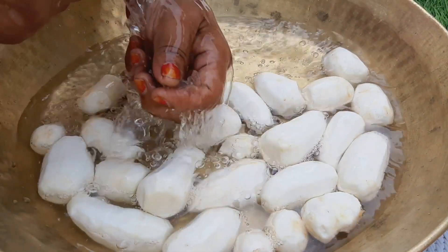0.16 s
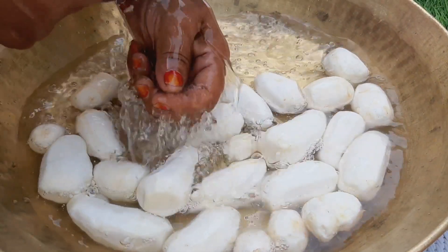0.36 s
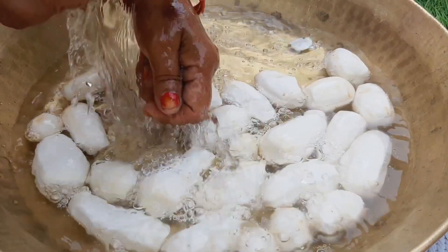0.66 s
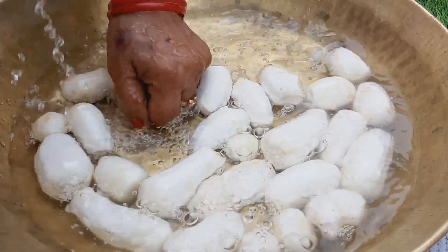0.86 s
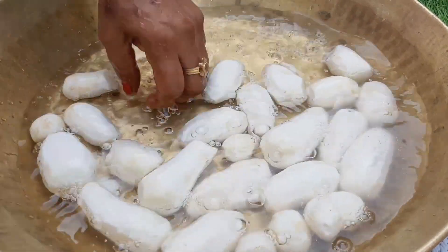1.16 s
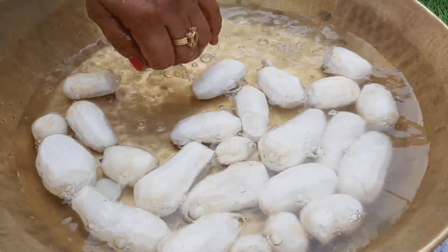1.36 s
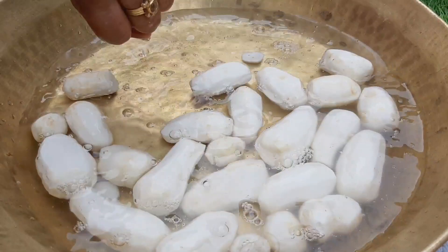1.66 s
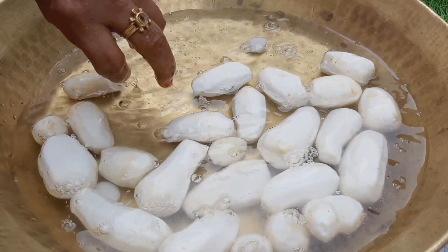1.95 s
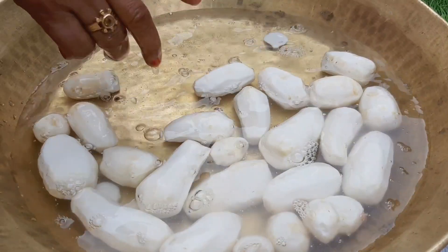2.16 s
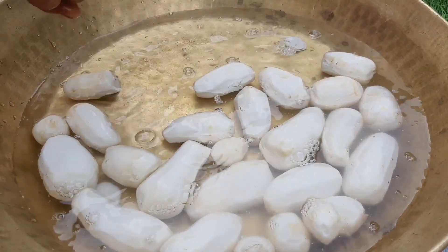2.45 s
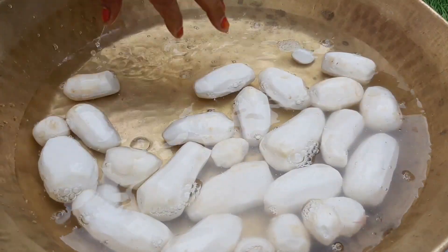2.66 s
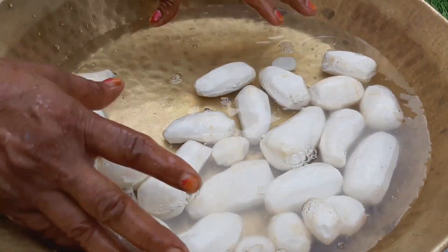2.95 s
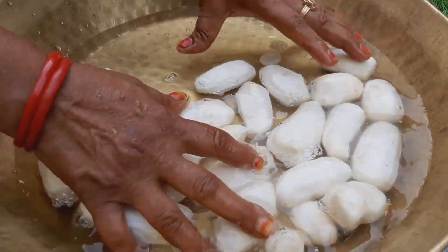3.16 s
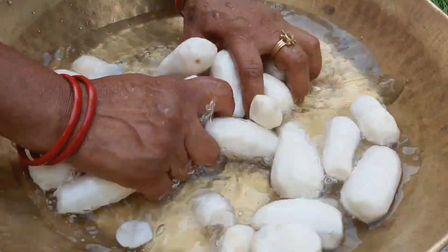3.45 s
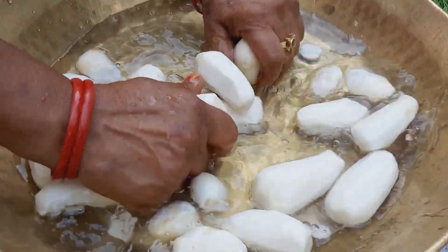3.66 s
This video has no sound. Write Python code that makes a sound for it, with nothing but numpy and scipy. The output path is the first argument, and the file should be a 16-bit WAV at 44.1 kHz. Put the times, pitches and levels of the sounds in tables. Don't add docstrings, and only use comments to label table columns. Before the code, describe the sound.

Splashing water in a metal basin bubbles and stops, then roots are stirred with knocks and clinks

```python
import sys
import numpy as np
from scipy import signal
from scipy.fft import rfft, irfft, next_fast_len
from scipy.io import wavfile
from scipy.ndimage import uniform_filter1d, map_coordinates

SR = 44100
rng = np.random.default_rng(int(sys.argv[2]) if len(sys.argv) > 2 else 0)


def file_out(sig):
    cols = np.atleast_2d(sig).T
    lim = np.clip(cols, -1, 1)
    pcm = np.round(lim * 32767).astype(np.int16)
    wavfile.write(sys.argv[1], SR, pcm)


def gain_from_db(level_db):
    decades = np.asarray(level_db, float) / 20
    return 10 ** decades


N = 167580


def unit(x):
    return x / np.sqrt(np.mean(x ** 2) + 1e-20)


def along(points, hz):
    f, v = np.transpose(points)
    return np.interp(np.log(hz + 1), np.log(f + 1), v)


def strength(rows):
    s, db = np.transpose(rows)
    return np.interp(np.arange(N) / SR, s, db, left=-120, right=-120)


def wobble(rate_hz):
    knots = rng.standard_normal(int(N * rate_hz / SR) + 4)
    return map_coordinates(knots, [np.arange(N) * rate_hz / SR])


def filtered(x, response):
    m = next_fast_len(N + 8192)
    return irfft(rfft(x, m) * response(np.fft.rfftfreq(m, 1 / SR)), m)[..., :N]


def highpass(x, corner_hz):
    return filtered(x, lambda hz: 1 / (1 + (corner_hz / (hz + 1)) ** 4))


# (frequency [Hz], correlation [0-1])
ALIKE = [(60, 0.98), (300, 0.88), (1000, 0), (4000, 0.026)]


def rush(gain, patchy_db):
    z = signal.stft(rng.standard_normal((2, N)), nperseg=256)[2]
    field = uniform_filter1d(rng.standard_normal(z.shape[1:]), size=5, axis=0)
    field = uniform_filter1d(field, size=4, axis=1)
    pair = signal.istft(z * gain_from_db(patchy_db * unit(field)), nperseg=256)[1][:, :N]

    def mid_side_gain(hz):
        turn = np.arccos(np.clip(along(ALIKE, hz), 0, 1)) / 2
        return gain(hz) * [np.cos(turn), np.sin(turn)]

    mid, side = filtered(pair, mid_side_gain)
    return unit(np.array([mid + side, mid - side]))


def grains(s, db, hz, cycles, rise, spread, size, onset=30):
    t = np.arange(size) / SR
    u = t * (hz / cycles)[:, None]
    envelope = gain_from_db(db)[:, None] * np.exp(-3 * u) * (1 - np.exp(-onset * u))
    wave = envelope * np.sin(2 * np.pi * hz[:, None] * t * (1 + rise * np.minimum(u, 2)))
    place = spread * rng.standard_normal((len(s), 2))
    out = []
    for side in (1, -1):
        start = np.round(s * SR + side * (-2 + 3 * place[:, 0])).astype(int).clip(0)
        at = start[:, None] + np.arange(size)
        panned = wave * gain_from_db(2 * side * place[:, 1:])
        out.append(np.bincount(at.ravel(), panned.ravel(), N + size + 99)[:N])
    return np.array(out)


def swarm(level_db, span_s, count, hz, octaves, cycles, scatter_db, size):
    u, g = rng.random((count, 2)), rng.standard_normal((count, 2))
    s = np.interp(u[:, 0], (0, 1), span_s)
    db = level_db[(s * SR).astype(int).clip(0, N - 1)] - scatter_db * np.log(1.03 - u[:, 1])
    pitch_hz = (hz * 2 ** (octaves * g[:, 0])).clip(150, 16000)
    return grains(s, db, pitch_hz, cycles * np.exp(0.29 * g[:, 1]), 0.091, 0.93, size)


def ringing(events, modes, detune, crack_db, crack_s, chatter):
    snap_db, snap_s = 6.5, 0.0047
    out, t = np.zeros((2, N + SR)), np.arange(SR // 6) / SR
    f, level, t60 = np.transpose(modes)[:, :, None]
    attack = 1 - np.exp(-t / 0.00079)
    for s, db, ring_db, damping in events:
        g = rng.standard_normal((4, len(modes), 1))
        rub = uniform_filter1d(rng.standard_normal((len(modes), len(t))), size=50, axis=1)
        rough = 1 + chatter * unit(rub)
        for side in (0, 1):
            decay = gain_from_db(level + 2 * g[0] + 2 * g[2 + side] - 60 * damping * t / t60)
            tone = np.sin(2 * np.pi * f * (1 + detune * g[1]) * t + side * g[3])
            ring = (rough * decay * tone).sum(0)
            crack = gain_from_db(crack_db - 60 * damping * t / crack_s) + gain_from_db(crack_db + snap_db - 60 * t / snap_s)
            crack = crack * rng.standard_normal(len(t))
            out[side, round(s * SR):][:len(t)] += gain_from_db(db) * (gain_from_db(ring_db - 9.5) * ring + crack) * attack
    return highpass(out[:, :N], 900)


def echoes(x, t60):
    t = np.arange(SR // 2) / SR
    tail = rng.standard_normal((2, len(t))) * gain_from_db(-60 * t / t60)
    return signal.fftconvolve(np.atleast_2d(x), tail / np.linalg.norm(tail[0]), axes=1)[:, :N]


# (frequency [Hz], density [dB per Hz])
RUMBLE = [(28, -21), (48, 0.5), (90, -1), (125, -11.5), (175, -4.5), (300, -25.5), (600, -42.5)]
# (frequency [Hz], density [dB per Hz])
AIR = [(500, -23.5), (1500, -14.5), (2650, -16), (4600, -8.5), (6500, -17), (8400, -22), (12300, -17),
       (14300, -16.5)]


def air():
    rumble = rush(lambda hz: gain_from_db(along(RUMBLE, hz)) * (hz < 600), patchy_db=1.33)
    hiss = rush(lambda hz: gain_from_db(along(AIR, hz)) * (hz > 500), patchy_db=1.7)
    return gain_from_db(-51 + 0.75 * wobble(0.68)) * rumble + gain_from_db(-61.5) * hiss


# (center [Hz], width [Hz], level [dB], flutter [dB])
INSECTS = [
    (3811, 80, -60, 2),
    (3400, 50, -71, 2),
    (10270, 970, -60, 0.3),
    (5560, 500, -80.5, .5),
]
# (time [s], level [dB])
CHORUS = [(0, 8.5), (1.9, 0), (2.3, -6), (2.8, 3.5), (3.0, -5), (3.3, -15), (3.8, 3)]


def insects():
    out = np.zeros((2, N))
    for k, (center_hz, width_hz, db, flutter_db) in enumerate(INSECTS):
        level_db = db + (k < 2) * strength(CHORUS)
        level_db = level_db + flutter_db * wobble(45) + 0.67 * flutter_db * wobble(4.66)
        band = rush(lambda hz: np.exp(-((hz - center_hz) / width_hz) ** 2), patchy_db=0.5)
        out += gain_from_db(level_db) * band
    return out


# (time [s], level [dB])
FLOW = [
    (0, -40),
    (.3, -39.5),
    (.76, -38),
    (.81, -43.5),
    (.87, -42),
    (.92, -46),
    (.97, -55),
    (1.15, -60.5),
    (1.6, -70),
]
# (frequency [Hz], density [dB per Hz])
SPRAY = [(450, -22.5), (900, -8), (2000, -8), (3500, -6.5), (8000, -16.5), (14500, -11), (16000, -7)]


def pour():
    flow = strength(FLOW) + 1.7 * wobble(30.7)
    deep = flow + 0.45 * (flow - flow[0])
    spray = rush(lambda hz: gain_from_db(along(SPRAY, hz)) * (hz > 400), patchy_db=3)
    spray = gain_from_db(deep + 2.5 + 1.6 * wobble(60.2)) * spray
    bubbles = swarm(deep, (0, 0.95), count=1500, hz=2223, octaves=0.435, cycles=8.8, scatter_db=3.5, size=700)
    fizz = swarm(flow - 7.5, (0, 1.6), count=5000, hz=7000, octaves=0.8, cycles=4, scatter_db=2.5, size=120)
    spatter = swarm(flow + 6, (0, 1.6), count=700, hz=9500, octaves=0.58, cycles=4.8, scatter_db=3.5, size=60)
    return spray + bubbles + fizz + spatter


# (time [s], peak [dB])
SPATS = [(0.0074, -18), (0.1071, -17.5), (0.179, -21), (0.196, -14.5), (0.2157, -19), (0.336, -15.5),
         (0.403, -23), (0.4343, -38), (0.4538, -31), (0.5136, -25), (0.589, -22), (0.6069, -21),
         (0.624, -18), (0.675, -24.5), (0.747, -23), (0.784, -16), (0.8035, -34), (0.843, -15.5),
         (0.8805, -22), (0.9626, -27), (0.991, -32.5), (1.1248, -36.5), (1.9124, -34), (3.3794, -37),
         (3.4958, -37), (3.5147, -47), (3.61, -35.5), (3.615, -27), (3.6256, -29), (3.6603, -25),
         (3.681, -31), (3.6958, -37), (3.7004, -29), (3.7034, -28), (3.749, -30.5)]


def drops():
    s, db = np.repeat(SPATS, 7, axis=0).T
    g = rng.standard_normal((len(s), 3))
    burst_s = 0.0012
    hz = (8500 * 2 ** (0.5 * g[:, 2])).clip(2500, 16000)
    ticks = grains(s + burst_s * abs(g[:, 0]), db - 2.5 + 3.0 * g[:, 1], hz, 4.1, 0.051, 0.36, size=100)
    return highpass(ticks, 2500)


# (time [s], peak [dB], pitch [Hz])
GURGLES = [(0.059, -44, 770), (0.108, -31.5, 768), (0.163, -45, 817), (0.184, -36, 1025),
           (0.231, -30.5, 920), (0.274, -38, 910), (0.306, -32, 870), (0.367, -28.5, 986),
           (0.403, -38, 895), (0.442, -46, 902), (0.495, -46, 820), (0.537, -39, 738), (0.563, -33.5, 950),
           (0.629, -34.5, 920), (0.74, -31.5, 960), (0.855, -48, 906)]


def gurgles():
    s, db, hz = np.transpose(GURGLES)
    return grains(s, db + 1, hz, 20, 0.027, 0.1, size=2000, onset=7)


# (time [s], peak [dB], pitch [Hz])
BUBBLES = [(0.147, -28, 1540), (0.16, -10, 2360), (0.151, -23, 1380), (0.173, -24.5, 1490),
           (0.165, -19, 1370), (0.375, -21, 3320), (0.481, -16.5, 2120), (0.568, -21, 1995),
           (0.624, -26, 1830), (0.673, -21.5, 2940), (0.719, -22, 1540), (0.744, -20.5, 2130),
           (0.771, -14, 4650), (0.992, -23.5, 4040), (0.13, -18.5, 3280), (.217, -26.5, 1480),
           (.34, -23, 1440), (.353, -23.5, 1680), (.421, -35, 2070), (.652, -18, 2030), (.815, -26.5, 2060),
           (.886, -31.5, 2000), (.908, -36, 1950)]


def large_bubbles():
    s, db, hz = np.transpose(BUBBLES)
    return grains(s, db - 2.5, hz, 22, 0.021, 0.11, size=1500)


# (time [s], peak [dB], ring over crack [dB], damping [x])
KNOCKS = [
    (.369, -16, -32, 0.37),
    (2.9695, -17.5, -3.5, 0.84),
    (3.5355, -25, 6.5, 1.1),
    (3.5417, -7, 3, 3.26),
    (3.5475, -9.5, -11, 5.4),
]
# (time [s], peak [dB])
TAPS = [(3.3247, -34), (3.3706, -32.5), (3.458, -47), (3.4888, -31), (3.5795, -32.5), (3.613, -31),
        (3.661, -34.5), (3.68, -33), (3.7152, -34.5), (3.7507, -38)]
# (frequency [Hz], level [dB], t60 [s])
BASIN = [(706, -18, 0.29), (919, -19, 0.21), (1233, -20.5, 0.27), (1540, -6.5, 0.069), (1938, -1.5, 0.11),
         (2052, -1.5, 0.11), (2365, -1.5, 0.039), (4330, -13, 0.098)]


def basin():
    taps = [(s, db, 0, 1.9) for s, db in TAPS]
    return ringing(KNOCKS + taps, BASIN, 0.0072, crack_db=-2.5, crack_s=0.036, chatter=0.4)


# (time [s], length [s], level [dB], first pitch [Hz], last pitch [Hz])
WHISTLES = [
    (1.981, .131, -67, 5010, 3410),
    (2.421, .131, -68, 4900, 3310),
    (2.741, .121, -69, 4610, 3410),
    (1.441, .331, -77, 898, 898),
    (2.551, .201, -77, 391, 394),
]


def small_bird():
    out = np.zeros(N)
    for s, length_s, db, first_hz, last_hz in WHISTLES:
        u = np.linspace(0, 1, round(length_s * SR))
        hz = last_hz + (first_hz - last_hz) * abs(1 - u) ** 1.8
        phase = 2 * np.pi * np.cumsum(hz * (1 + 0.037 * wobble(302)[:len(u)])) / SR
        out[round(s * SR):][:len(u)] += gain_from_db(db + 13) * abs(np.sin(np.pi * u)) ** 0.5 * np.sin(phase)
    return out


# (time [s], length [s], level [dB], top pitch [Hz])
CAWS = [
    (1.674, .33, -56, 538),
    (1.998, 0.18, -66.5, 489.5),
    (2.289, 0.17, -72.5, 507),
    (2.446, 0.23, -62, 517),
    (2.594, 0.39, -62.5, 537.8),
]
# (frequency [Hz], gain [dB])
BEAK = [(500, -22.5), (800, -10), (1100, -12.5), (1600, -6), (2050, 5), (2500, -14), (2800, -11),
        (3300, -14)]


def crow():
    arch, rasp = 0.17, 0.42
    caw = np.zeros(N)
    for s, length_s, db, top_hz in CAWS:
        u = np.linspace(0, 1, round(length_s * SR))
        hz = top_hz * (1 - arch * abs(2 * u ** 0.8 - 1) ** 1.4)
        phase = 2 * np.pi * np.cumsum(hz * (1 + 0.01206 * wobble(25)[:len(u)])) / SR
        pulses = sum(np.cos(k * phase) for k in range(1, 7))
        voice = pulses + rasp * 9 * rng.standard_normal(len(u))
        caw[round(s * SR):][:len(u)] += gain_from_db(db) * abs(np.sin(np.pi * u)) ** 0.59 * voice
    return filtered(caw, lambda hz: gain_from_db(along(BEAK, hz)))


def birds():
    far = small_bird() + crow()
    return gain_from_db(-8.5) * far + echoes(far, t60=0.43)


# (time [s], peak [dB])
CLINKS = [(1.7844, -39.5), (1.7908, -33.5), (1.8294, -39), (1.8677, -38), (2.296, -38), (2.3101, -36),
          (2.3462, -39.5), (2.9692, -16), (2.9845, -24.5), (3, -25.5), (3.0696, -41), (3.0869, -29),
          (3.0976, -39), (3.1089, -33), (3.327, -41), (3.3307, -29), (3.351, -27), (3.4096, -22),
          (3.4188, -22.5), (3.717, -25)]
# (frequency [Hz], level [dB], t60 [s])
GLASS = [(4680, -11, .045), (8700, -5, .055), (9050, -4, .055), (13600, -3, .045), (13900, -2, .045),
         (14500, -3, .04)]


def bangles():
    contacts = [(s, db, 0, 1) for s, db in CLINKS]
    return ringing(contacts, GLASS, 0.0132, crack_db=-19.5, crack_s=0.11, chatter=0.71)


# (time [s], level [dB])
STIR = [
    (3.2, -86),
    (3.33, -48.5),
    (3.45, -46.5),
    (3.55, -40),
    (3.7, -44.5),
    (3.8, -63),
]
# (frequency [Hz], density [dB per Hz])
SLOSH = [(40, -5), (300, 1.5), (1100, -12), (2000, 6.5), (4000, -8), (15000, -28)]


def stir():
    push = strength(STIR) + 3.1 * wobble(25.36)
    slosh = rush(lambda hz: gain_from_db(along(SLOSH, hz)) * (hz > 35), patchy_db=3)
    slosh = gain_from_db(push - 4.5 + 4.7 * wobble(40)) * slosh
    swell = swarm(push - 4, (3.24, 3.8), count=160, hz=434, octaves=0.46, cycles=6.7, scatter_db=2, size=1800)
    small = swarm(push - 6, (3.3, 3.8), count=260, hz=1840, octaves=0.68, cycles=4.1, scatter_db=2, size=700)
    fizz = swarm(push - 3, (3.3, 3.8), count=120, hz=6960, octaves=0.73, cycles=9.3, scatter_db=3.5, size=100)
    return slosh + swell + small + fizz


# (time [s], peak [dB], pitch [Hz])
GULPS = [(3.246, -50, 575), (3.278, -42, 276), (3.327, -33, 585), (3.37, -30, 284), (3.49, -31.5, 398),
         (3.58, -29.5, 810), (3.62, -20.5, 558), (3.633, -30.5, 423), (3.68, -31.5, 1950)]


def gulps():
    s, db, hz = np.transpose(GULPS)
    return grains(s, db - 3.5, hz, 14, 0.058, 0.27, size=2600)


# (time [s], peak [dB], pitch [Hz])
THUDS = [(3.331, -40, 487), (3.371, -28, 236), (3.4, -33, 200), (3.494, -30, 314), (3.502, -42, 346),
         (3.537, -28, 200), (3.542, -13, 1120), (3.546, -17, 1450), (3.491, -28, 1310), (3.666, -38, 303),
         (3.742, -38, 180)]


def thuds():
    s, db, hz = np.transpose(THUDS)
    return grains(s, db, hz, 2.37, 0, 0.088, size=2000)


def scene():
    far = air() + insects()
    water = pour() + drops() + gurgles() + large_bubbles()
    near = water + basin() + bangles() + stir() + gulps() + thuds()
    return near + gain_from_db(-6.5) * echoes(near.mean(0), t60=0.035) + birds() + far


def top_cut(x):
    return signal.sosfilt(signal.butter(12, 16800, fs=SR, output="sos"), x)


def record(dry):
    mix = filtered(dry, lambda hz: 1 / (1 + (hz / 15240) ** 60))
    return top_cut(mix)


dry = scene()
out = record(dry)
file_out(out)
```